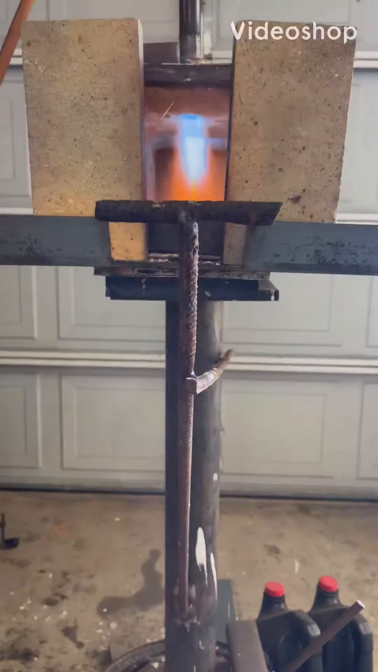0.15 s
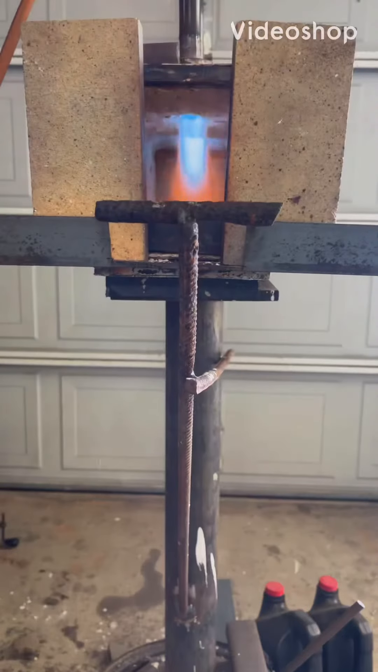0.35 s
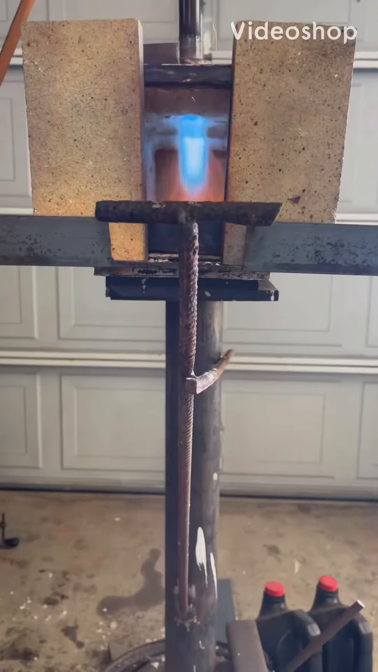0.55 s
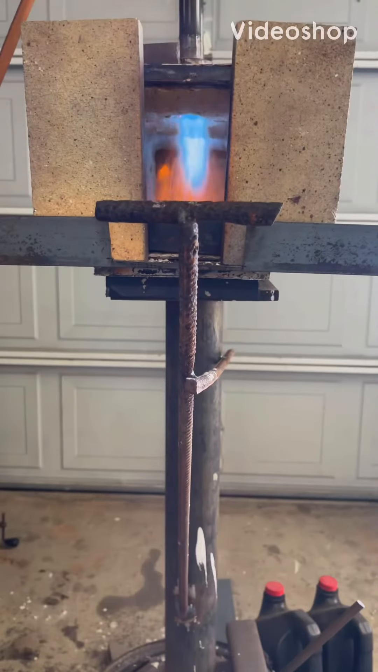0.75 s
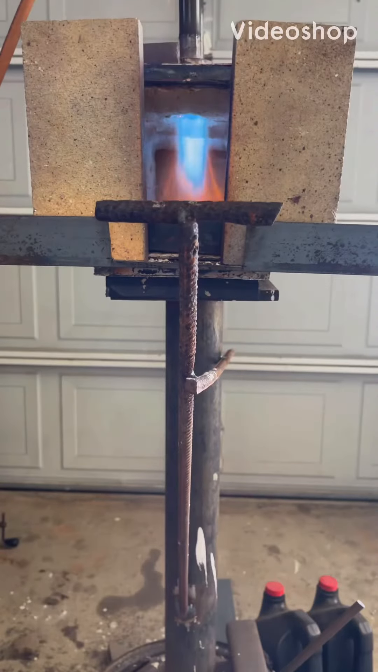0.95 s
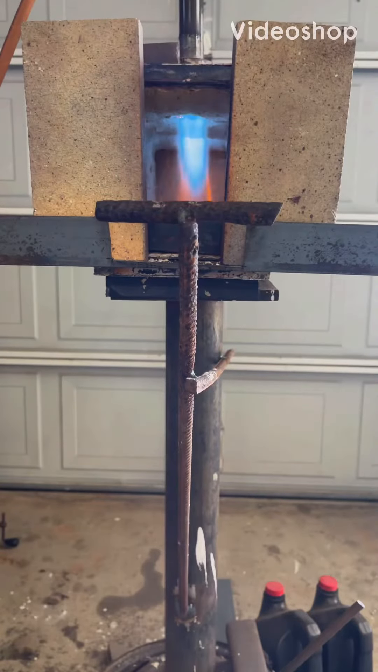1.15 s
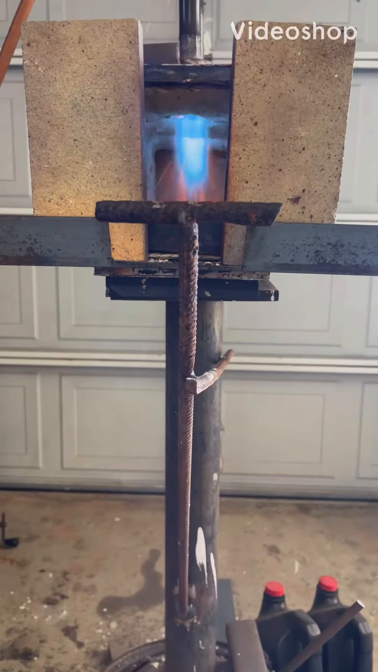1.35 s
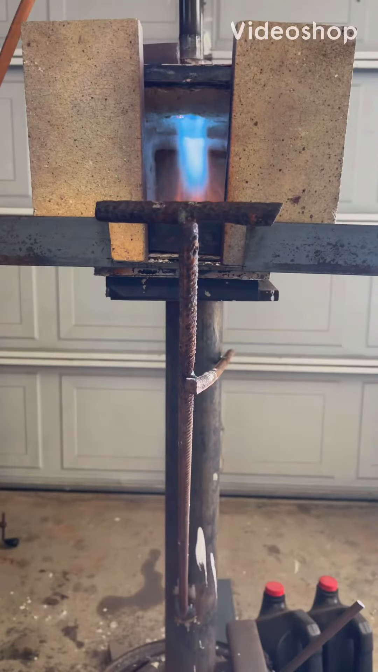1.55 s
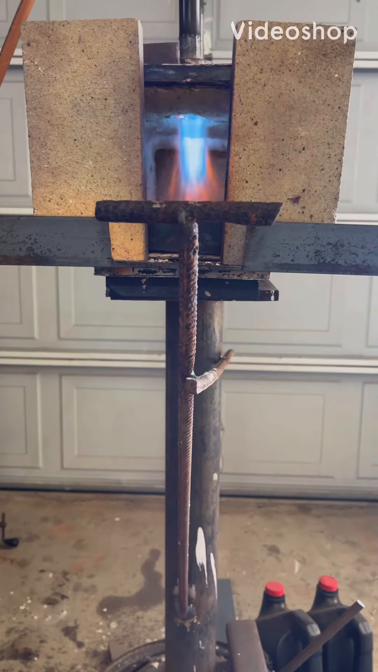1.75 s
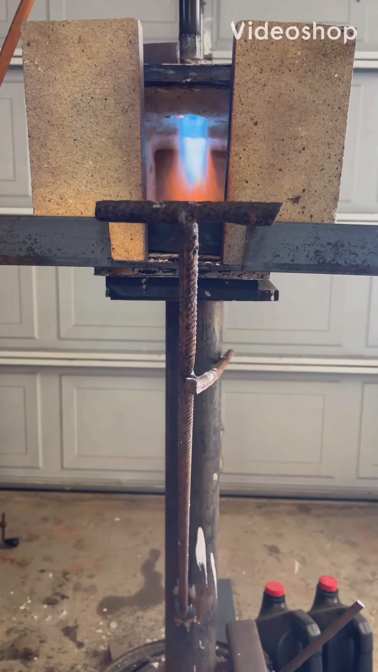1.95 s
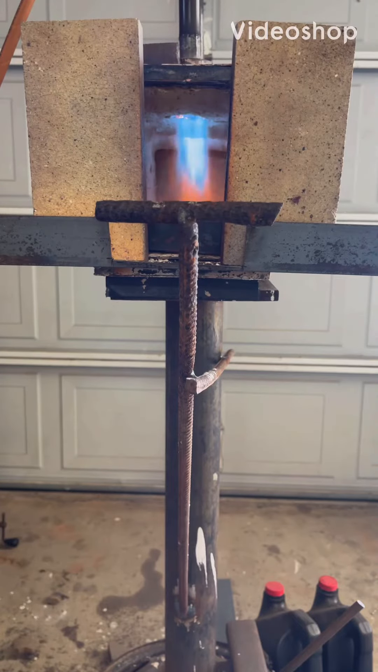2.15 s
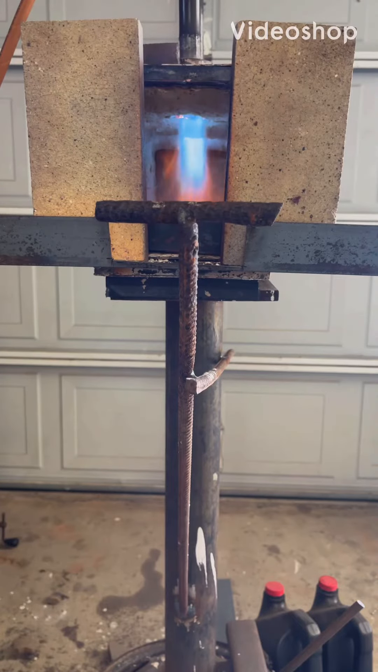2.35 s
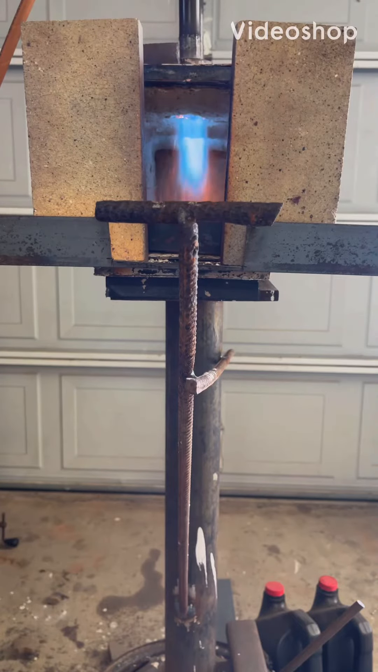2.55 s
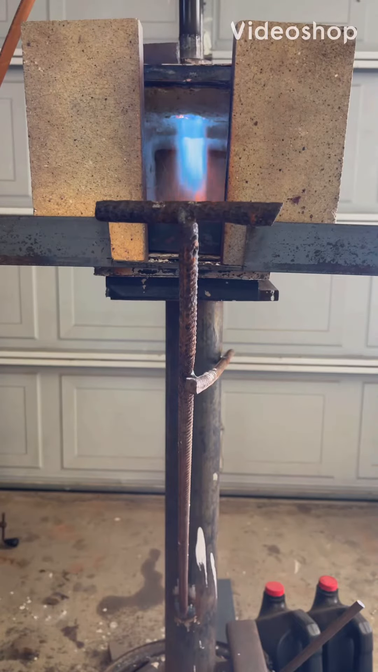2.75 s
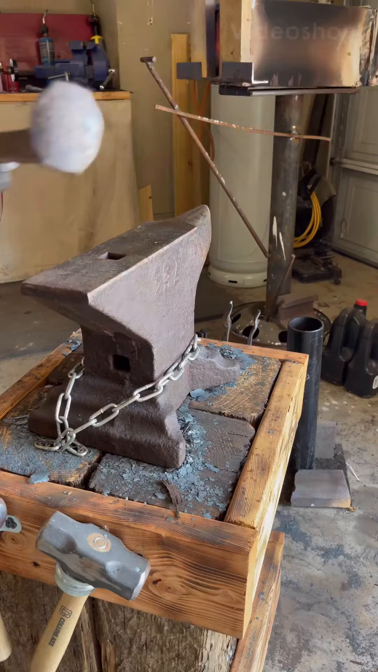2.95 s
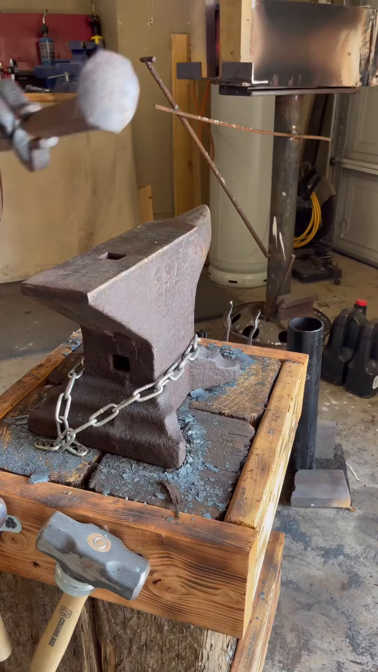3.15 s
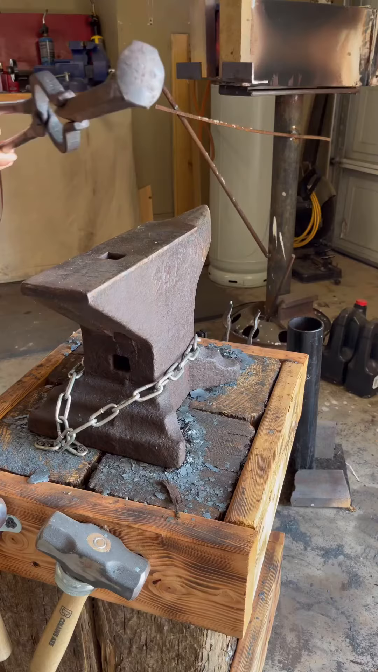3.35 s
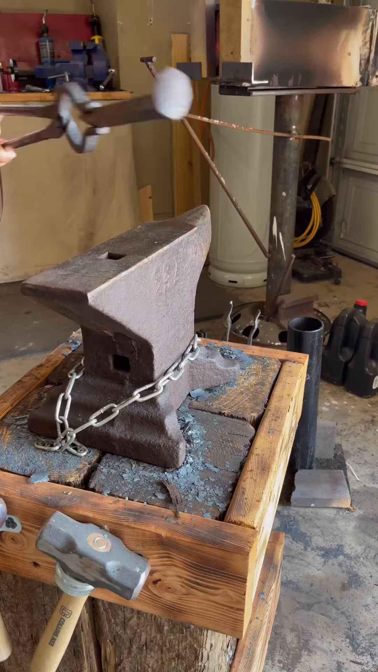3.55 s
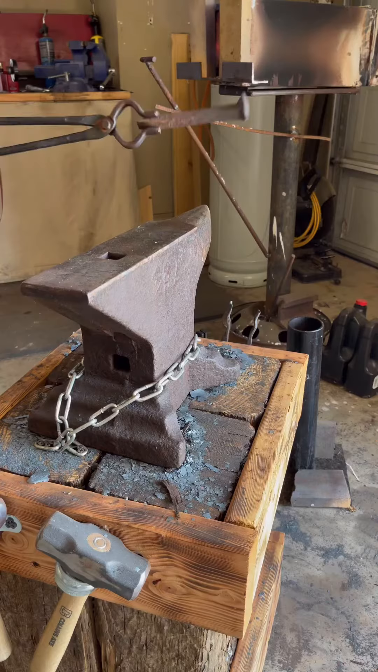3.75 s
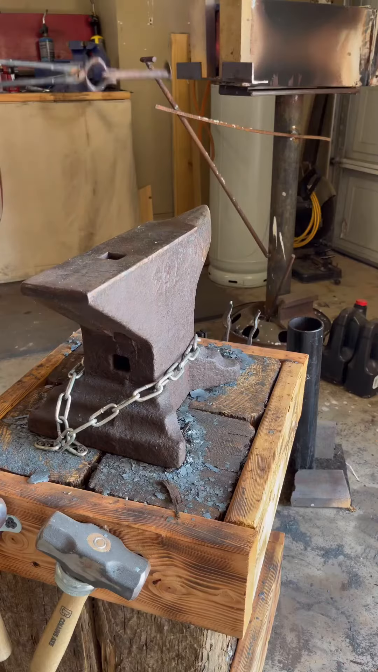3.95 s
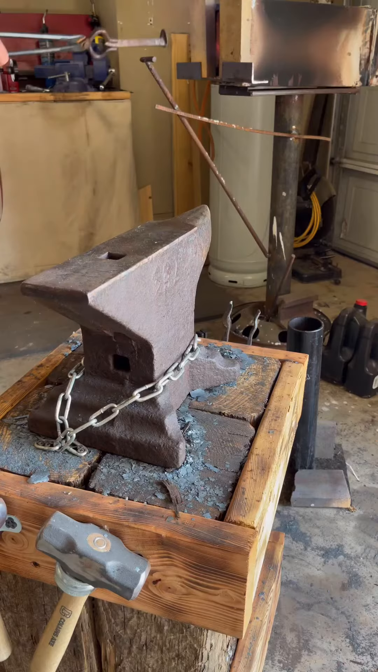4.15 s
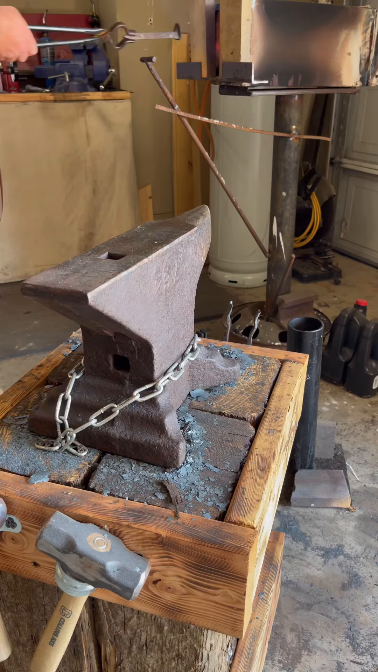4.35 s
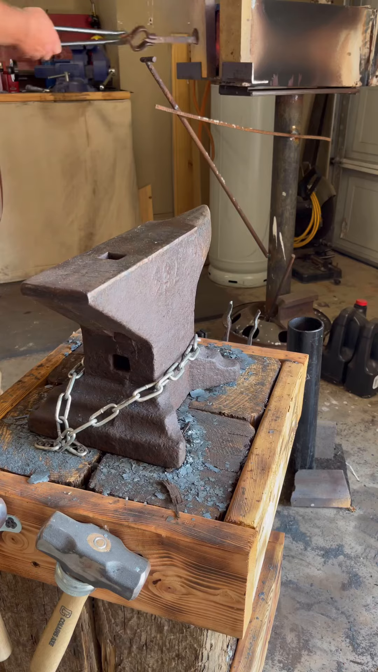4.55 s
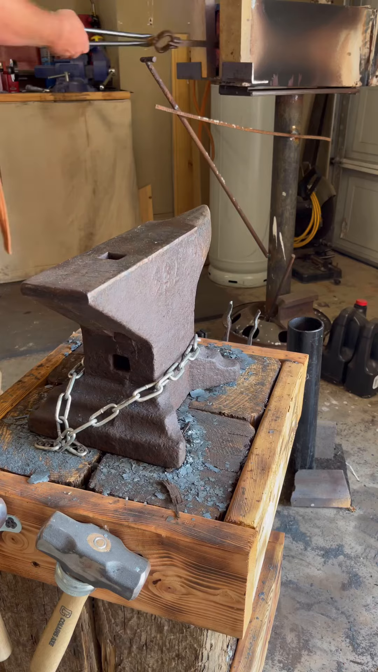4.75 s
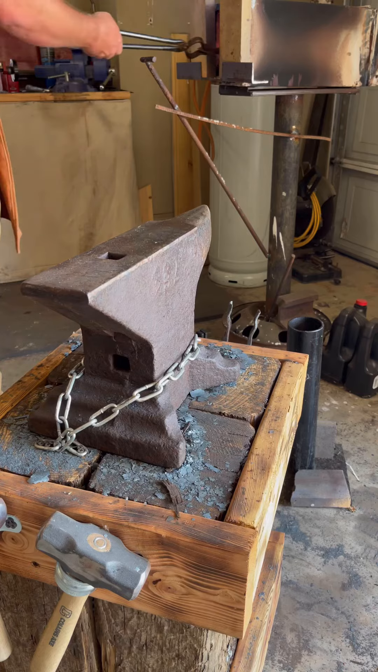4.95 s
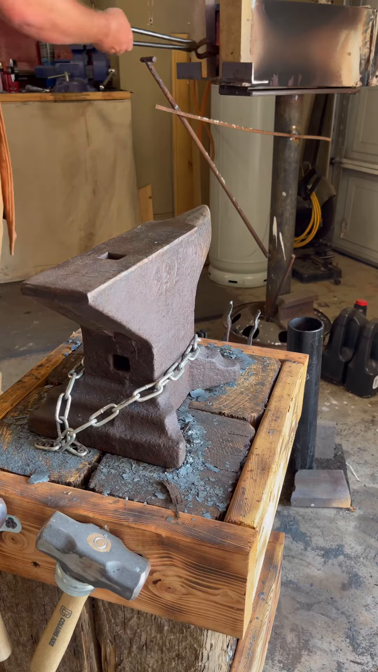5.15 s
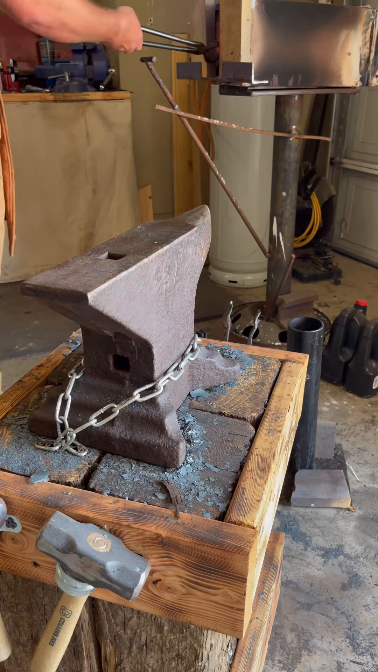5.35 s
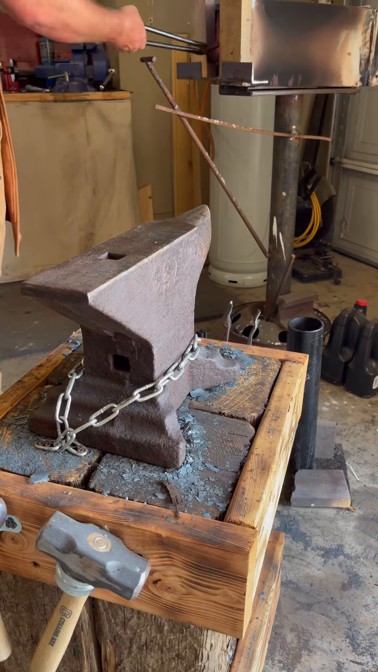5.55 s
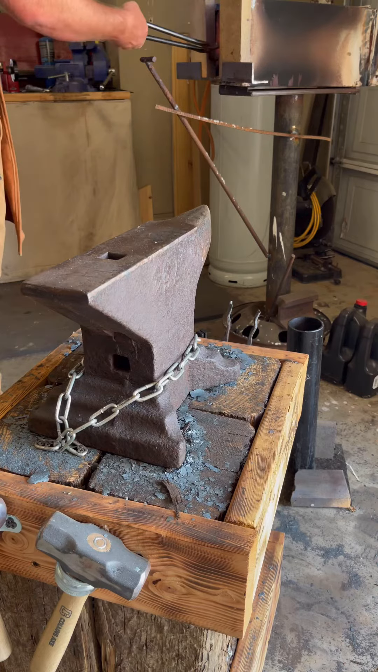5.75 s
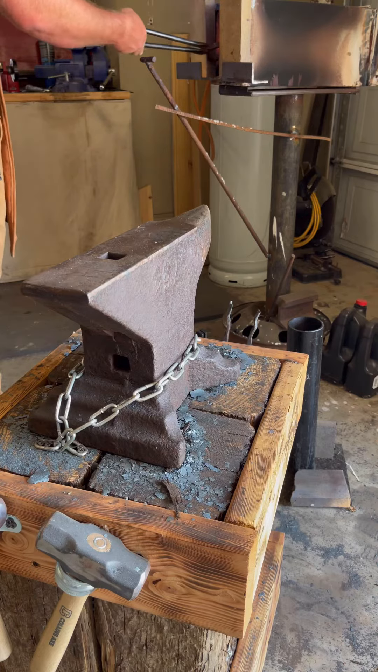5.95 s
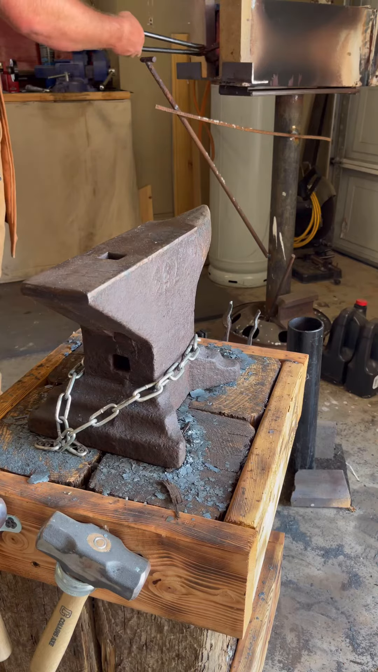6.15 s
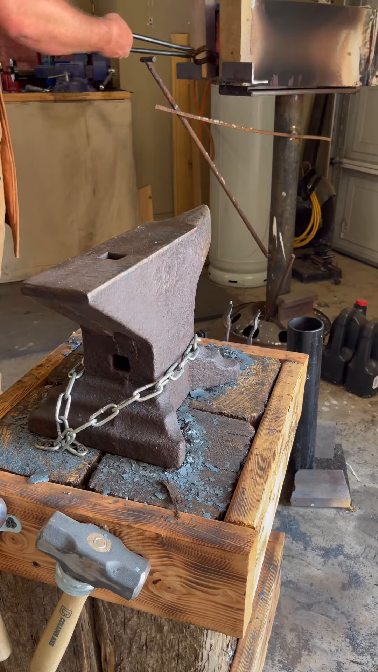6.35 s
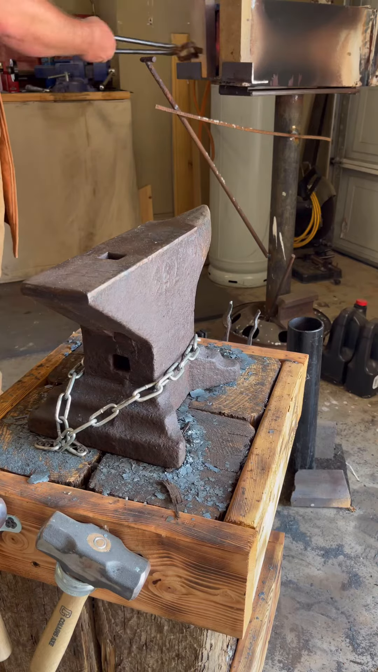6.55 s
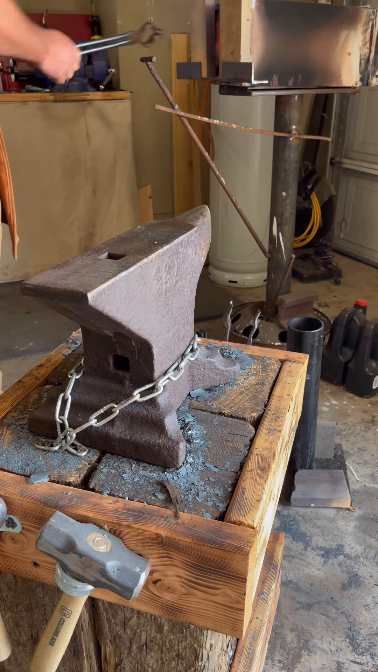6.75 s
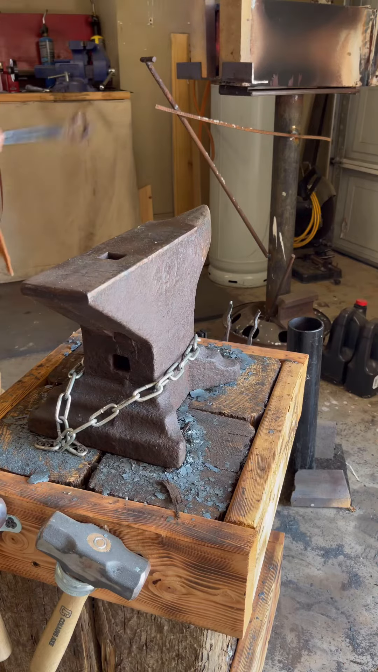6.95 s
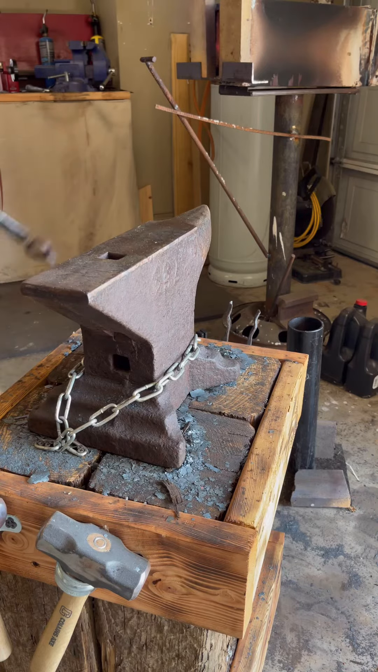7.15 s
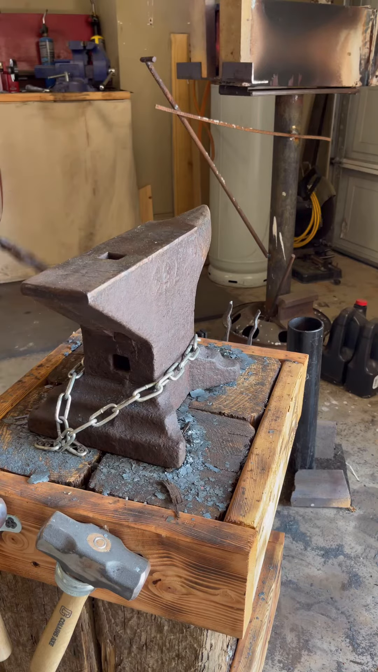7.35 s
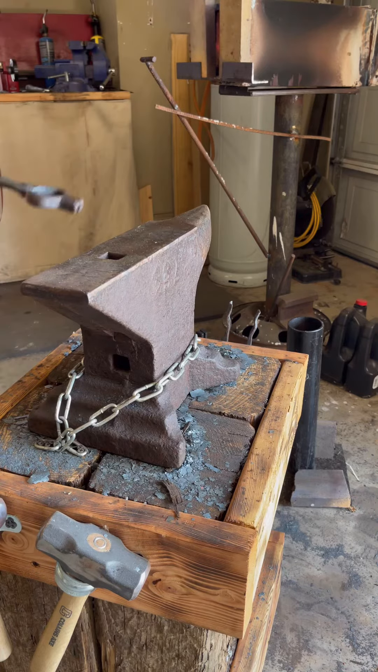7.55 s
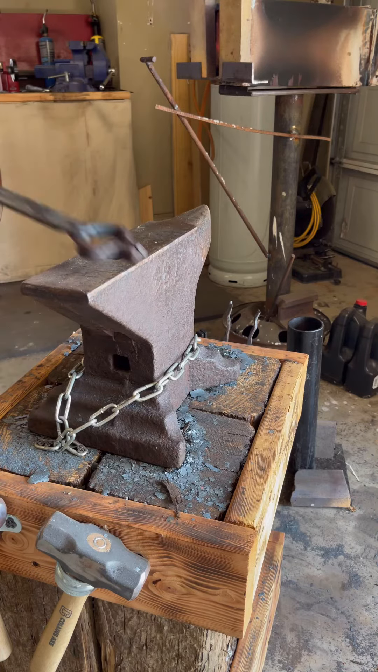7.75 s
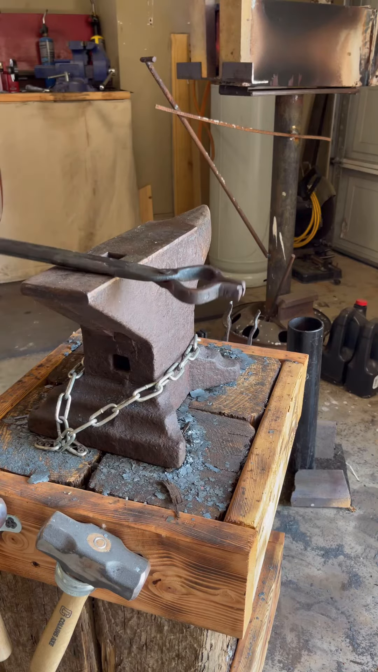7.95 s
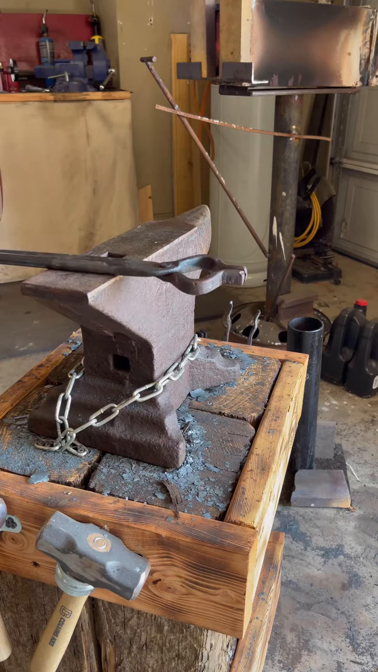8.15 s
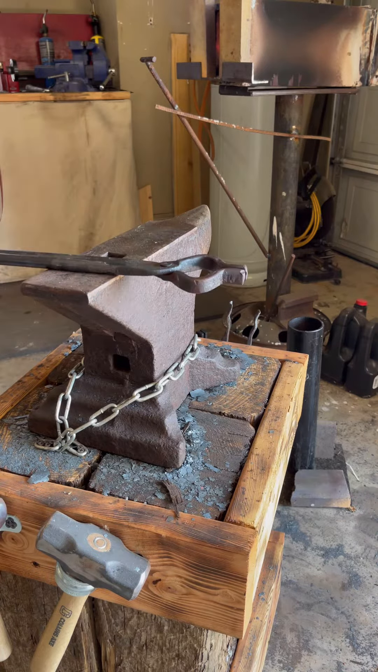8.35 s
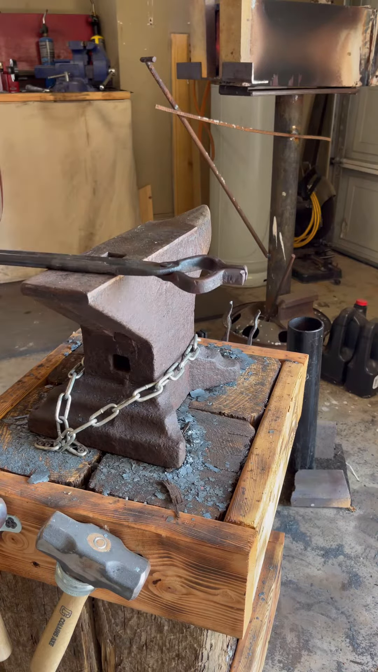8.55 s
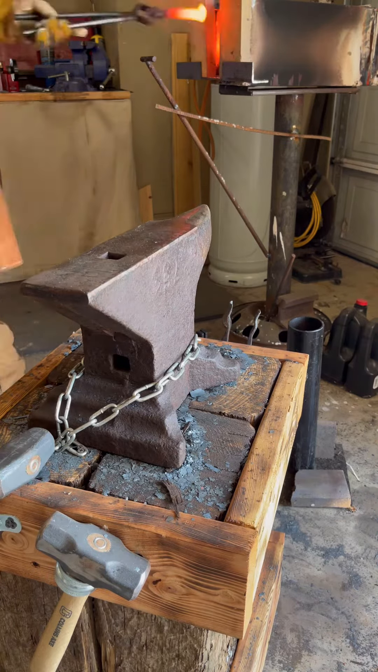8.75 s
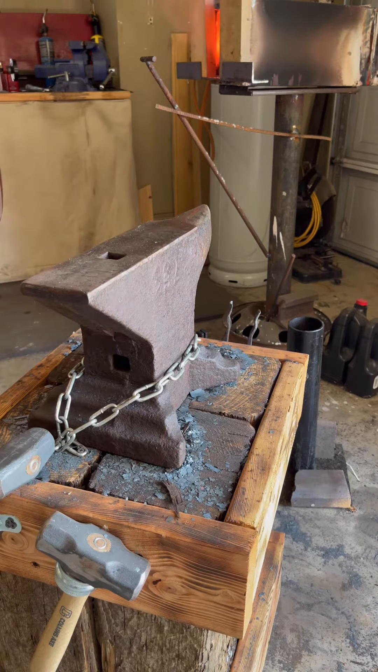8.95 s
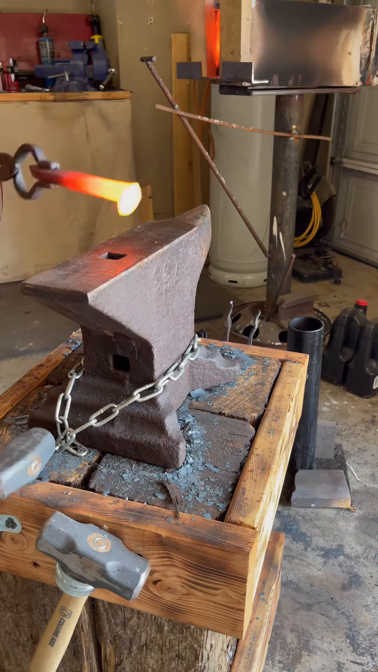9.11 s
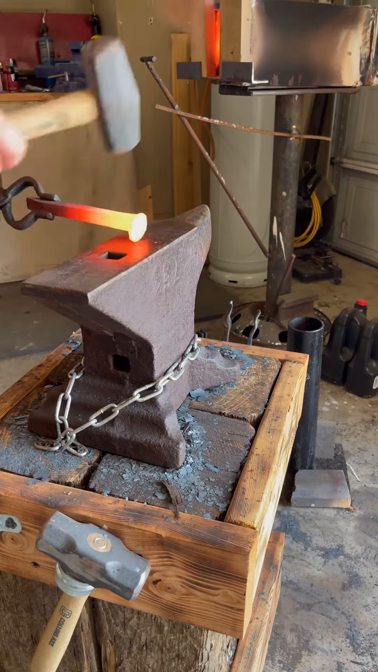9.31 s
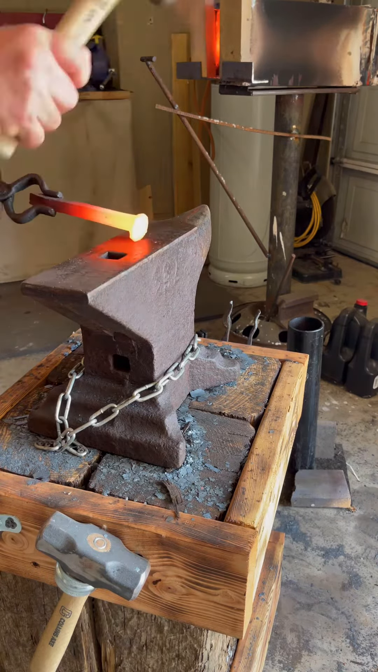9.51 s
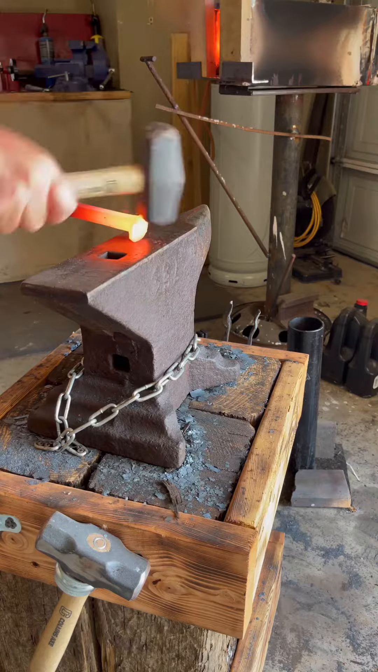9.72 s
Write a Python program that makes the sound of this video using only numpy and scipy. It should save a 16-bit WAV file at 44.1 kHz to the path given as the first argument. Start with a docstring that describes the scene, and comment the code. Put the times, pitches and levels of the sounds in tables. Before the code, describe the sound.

Steady burner roar in a garage, abruptly muffled, metal tongs clinking on an anvil, then a jump to high-pitched fast-motion hiss with five quick hammer clicks.

```python
"""A propane forge roars in a garage and spits a few crackles: this is in front of the burner. Then comes the dull roar
beside the anvil, where tongs are laid on the steel, then the same place in five-fold fast motion: a thin hiss and ticks.
The roar is coloured noise, flame rumble plus gas hiss, with peaks and dips that differ between the places. Crackles and
hammer blows are short noise bursts, ringing steel is a set of dying sine tones, and whistles and flecks are brief tones."""
import sys
import numpy as np
from scipy import signal
from scipy.fft import rfft, irfft, next_fast_len
from scipy.io import wavfile
from scipy.ndimage import uniform_filter1d

SR = 44100
rng = np.random.default_rng(int(sys.argv[2]) if len(sys.argv) > 2 else 0)


def unload_wav(signal):
    """Save mono or channel-first audio to the path in sys.argv[1] as 16-bit WAV at rate SR, clipped to [-1, 1]."""
    wavfile.write(
        sys.argv[1],
        SR,
        np.round(np.clip(np.atleast_2d(signal).T, -1, 1) * 32767).astype(np.int16),
    )


N = 431298
TIME = np.arange(N) / SR
HZ = np.fft.rfftfreq(next_fast_len(N, real=True), 1 / SR) + 1e-3  # just above 0, so its logarithm exists

# the three parts: (start [s], end [s])
FRONT_PART, ANVIL_PART, FAST_PART = (0, 2.979), (2.982, 8.637), (8.647, 9.8)
FAST_MOTION = 5  # how many times faster than natural

# broad colour of the roar in each part, only its shape counts: (natural-speed frequency [Hz], level [dB])
FRONT_COLOUR = [(22, -20), (45, -19), (80, -1.2), (200, -3), (400, -4.5), (700, -11), (1050, -11.5),
                (1600, -21), (2300, -17.5), (4000, -28), (7000, -28), (10500, -31.5), (13000, -47.5),
                (14200, -56), (15200, -72)]
ANVIL_COLOUR = [(22, -35.5), (40, -23.5), (75, -14), (140, -9.5), (200, 0.5), (360, -4), (460, -19.5),
                (750, -28), (1300, -31.5), (1650, -42), (2200, -29), (2800, -38.5), (3500, -40),
                (3750, -49)]
FAST_COLOUR = [(14, -64), (30, -31.5), (50, -20.5), (80, -14), (140, -7.5), (200, 0), (340, -2.5),
               (405, -6.5), (460, -16.5), (750, -27), (1300, -31), (1650, -36), (2200, -20), (2700, -24.5),
               (3130, -25.5)]
# peaks and dips in the colour of the roar at the two places:
# (natural-speed frequency [Hz], width [Hz], height [dB])
FRONT_PEAKS = [(104, 16.6, 3), (140, 12, 5.5), (149.5, 9, -3.5), (161.5, 14, 5.5), (172.7, 31.7, 14),
               (196, 10, -6.5), (219, 8.5, 3), (230.3, 21, 11.5), (265.7, 59, 11), (296.4, 7.8, -7),
               (305, 8.9, 5), (327, 8, 5.5), (534, 14, 2.5), (352.2, 35.6, 11), (421.6, 45, 10),
               (512, 29, -7.5), (525, 133, 8.5), (642, 52, 4.5), (846, 79, 4.5), (1000, 74, 3.5),
               (1156, 17, -10), (1777, 120, -11.5), (3085, 130, -10.5), (4870, 450, -13),
               (9010, 850, -25.5)]
ANVIL_PEAKS = [(57, 12, -2.5), (114, 22, -4), (137, 6.4, 3), (148, 7.4, -2.5), (161, 7.5, 3.5),
               (172.8, 15.7, -14), (198.7, 6, 2.5), (207.2, 5, -4.5), (214.7, 4.7, 2), (237.5, 17, -10.5),
               (301.3, 13.8, -7), (313.3, 9, 4.5), (342, 6.5, 1.5), (358.2, 11, -4.5), (367, 7, 3),
               (376, 6, -3.5), (383, 9, 3.5), (401, 7, -2.5), (427, 8, 5), (548, 16, 2.5), (443, 18, -6.5),
               (496, 25, 6), (571, 12, -4.5), (633, 110, 3.5), (684, 24, -14), (698.3, 18, 10),
               (757, 7.4, -7), (845.5, 11, 8.5), (883, 110, 3), (1040, 21, -6), (1090, 14, 4),
               (1210, 16, 3), (1300, 15, 3), (1471, 35, 5), (1606, 26, 3.5), (1795, 49, 8.5),
               (2400, 197, -6), (2550, 9.1, 8), (2920, 220, -5), (3150, 47, 1.5)]
# stereo width of the roar, before a side trim: (natural-speed frequency [Hz], side minus mid [dB])
FRONT_SIDE = [(60, -62), (200, -37), (400, -16.5), (700, -13.5), (1000, -18), (1400, -38), (2300, -28),
              (3200, 3), (6500, -1.5), (7500, 4), (9400, 26), (11000, 2), (14000, -12)]
ANVIL_SIDE = [(60, -46), (200, -32.5), (380, -20), (470, -12.5), (700, -9.5), (1300, -13.5), (1600, -18.5),
              (2200, -10), (2700, -4), (3600, -5.5)]
FAST_SIDE = [(60, -27), (140, -59), (260, -51), (320, -33), (450, -8.5), (900, -1), (1200, -14),
             (1900, -50), (2200, -2), (3000, 2)]
# part of the side sound is the direct roar reaching one port first; positive means the left leads:
# (natural-speed frequency [Hz], share [-1 to 1])
FRONT_LEAD = [(130, 0), (400, -0.44), (1500, -0.23), (2700, 0.196), (3400, 0.61), (4600, .7),
              (5200, -0.774), (7000, 0.74), (8500, 0.58), (10000, -1), (12500, 0)]
ANVIL_LEAD = [(110, 0), (260, -.55), (900, -.4), (1300, -.1), (1800, .62), (3700, .55)]
FAST_LEAD = [(280, 0), (480, -.4), (600, 0), (1900, 0), (2200, .35)]
# the burner runs at one setting; its level at the microphone: (flame [dB], gas jet [dB], drift [dB per s])
FRONT_LEVEL = (-20, -41, 0.077)
ANVIL_LEVEL = (-21, -43, 0.017)
FAST_LEVEL = (-21.5, -42.5, -2.1)
# the flame flutters, the gas flow wanders and the jet flickers: rates at natural speed, depths in dB
FLUTTER_PER_S, FLUTTER_DB = 6.4, 0.36
WANDER_PER_S, WANDER_DB = 0.41, 0.95
JET_FLICKER_PER_S, JET_FLICKER_DB = 15, 0.34
# depth of the random ripple in the colour above the bass; it gives the hiss a ringing grain
RIPPLE_DB, FAST_RIPPLE_DB = 1.7, 2.8

# hammer blows on the hot bar, in fast motion: (time [s], level [dB])
BLOWS = [(9.3710, -24), (9.4501, -19), (9.532, -20), (9.618, -18), (9.7020, -16.5)]
# colour of a blow, only its shape counts: (frequency [Hz], level [dB])
BLOW_COLOUR = [(60, -28), (170, -11), (330, 5.5), (700, 3), (1400, -0.5), (2800, 4), (4500, -5),
               (6200, -6.5), (7100, -5), (9000, -14), (15500, -17)]

# the tongs meet the anvil and settle:
# (time [s], contact [dB], ring of the tongs [dB], ring of the anvil [dB], tilt of the ring [dB per octave])
TONG_TOUCHES = [(7.6525, -40, -41, -65, -7), (7.6671, -27.5, -39, -54.5, -5), (7.6773, -38, -52, -64, -5.5),
                (7.7878, -26.5, -33, -46.5, 2), (7.796, -32, -49, -62, -1), (7.8123, -33, -52, -56, 0),
                (7.835, -38, -57.5, -47, 0.5), (7.8575, -36, -56, -55, 2)]
TILT_PIVOT_HZ = 2500  # the tilt changes nothing for a tone listed at this pitch
# colour of the contact noise, only its shape counts: (frequency [Hz], level [dB])
CONTACT_COLOUR = [(500, -31), (1300, 0.5), (2200, 2), (3000, 5.5), (3500, 0), (3800, -12), (4200, -17)]
# the hand-held tongs ring briefly, the anvil sings on; a speed factor then raises or lowers the pitch and
# shortens or stretches the ring: (frequency [Hz], level [dB], time to fall 60 dB [s])
TONG_MODES = [(1440, -6, .06), (1610, -7, .1), (2090, -3.5, .08), (2270, 0.5, 0.085), (2500, 4.5, 0.09),
              (2940, -2, .11), (3040, 0, .035), (3170, -0.5, .05), (3370, -7, .06), (3480, -2, 0.032)]
ANVIL_MODES = [(2935, -10, .4), (3015, -13, .35), (3150, -1.5, .45), (3210, -8, .35), (3630, -13.5, .25)]  # close pairs beat
# reflections make the ring of the steel swell and dip as it dies away
RING_SHIMMER_PER_S, RING_SHIMMER_DB = 45, 2.5

# crackles in the fire: (time [s], level [dB], time to fall 60 dB [s])
CRACKLES = [(0.046, -31.5, 0.029), (0.0502, -35, 0.025), (0.1712, -27.5, 0.008)]
# colour of a crackle, only its shape counts: (frequency [Hz], level [dB])
CRACKLE_COLOUR = [(4000, -25), (5200, -15), (6000, -1.5), (7000, 0.5), (8200, -5.5), (9200, -19),
                  (10500, -9.5), (12500, -19), (14500, -34)]

# the clearest thin whistles in the fast hiss: (middle time [s], frequency [Hz], level [dB])
WHISTLES = [(8.672, 12720, -46.5), (8.785, 5990, -44), (8.856, 9905, -47), (8.861, 11970, -49),
            (8.885, 10400, -47), (8.911, 8040, -50), (9.035, 7150, -50), (9.07, 2960, -35.5),
            (9.125, 11940, -46), (9.235, 11890, -47), (9.25, 10335, -47), (9.255, 4230, -44),
            (9.352, 11890, -45), (9.408, 10310, -40), (9.577, 7970, -47.5), (9.607, 3300, -34)]
WHISTLE_S = 0.048  # length of each
# high metallic tones that glimmer throughout the fast part, slowly fading: (frequency [Hz], level [dB])
GLIMMERS = [(5980, -60), (8020, -59), (9030, -64), (10330, -60), (10800, -58), (11060, -61), (11890, -59),
            (12010, -61), (13500, -66)]
GLIMMER_PER_S, GLIMMER_WIDTH_HZ = 10, 46
GLIMMER_DB, GLIMMER_DB_PER_S = 3, -4  # depth of the glimmer, and its slow fade
# random ringing flecks in the fast part: how many, their pitch range and their length
FLECK_COUNT, FLECK_RANGE_HZ, FLECK_S = 260, (2500, 15500), 0.04

TICK_S, TICK_DB = 4.369, -12  # one tiny dry tick, its level before the filters
DULL_HZ, TOP_HZ = 3900, 15850  # treble limits: beside the anvil, and of the whole sound


def undb(db):
    """Turn decibels into a plain multiplier."""
    return 10 ** (np.asarray(db) / 20)


def rms(x):
    """Average strength: the root of the mean square."""
    return np.sqrt(np.mean(x ** 2))


def colour(points, hz):
    """Gain at each frequency, joining the listed points in dB on a logarithmic frequency axis."""
    point_hz, point_db = np.transpose(points)
    return undb(np.interp(np.log(hz), np.log(point_hz), point_db))


def shape(x, gain):
    """Filter a sound by one gain per frequency."""
    size = next_fast_len(N, real=True)
    return irfft(rfft(x, size) * gain, size)[..., :N]


def noise(gain):
    """Steady random noise of the given colour, with average strength near 1."""
    return shape(rng.standard_normal(N), gain / rms(gain))


def walk(rate):
    """Smooth random movement, about rate times a second, with spread near 1."""
    return noise(np.exp(-(HZ / rate) ** 2))


def smooth(x, seconds):
    """Running mean, taken twice."""
    size = int(seconds * SR)
    return uniform_filter1d(uniform_filter1d(x, size), size)


def decay(start, t60):
    """An envelope that jumps to 1 and falls 60 dB in t60 seconds; it is cut off after half a second."""
    out = np.zeros(N)
    first = int(start * SR)
    age = TIME[:min(SR // 2, N - first)]
    out[first:first + len(age)] = np.exp(-np.log(1000) * np.minimum(age / t60, 10))
    return out


def click(start):
    """A single impulse."""
    out = np.zeros(N)
    out[int(start * SR)] = 1
    return out


def burst(envelope, gain):
    """Dense tiny impacts: noise under an envelope, then coloured."""
    return shape(envelope * rng.standard_normal(N), gain / rms(gain))


def stereo(mid, side):
    """Left and right: the side sound is added to one ear and taken from the other."""
    return np.array([mid + side, mid - side])


def low_pass(x, hz):
    """A steep cut of the treble."""
    return signal.sosfilt(signal.ellip(10, .2, 90, hz, fs=SR, output="sos"), x)


def cut(part):
    """1 while a part lasts, with edges about a millisecond long."""
    inside = (TIME >= part[0]) & (TIME < part[1])
    return smooth(inside * 1., .001)


def ripple(hz, spacing_hz, depth_db):
    """A random, irregular ripple over frequency, drawn anew for each part, gives the roar a fine tonal grain."""
    knots = np.arange(0, SR / 2, spacing_hz)
    db = depth_db * np.interp(hz, knots, rng.standard_normal(len(knots)))
    return undb(db * hz ** 2 / (hz ** 2 + 450 ** 2))  # the ripple fades out towards the bass


def burner(part, levels, broad, peaks, diffuse, lead, speed, ripple_db, side_db):
    """Flame rumble and gas hiss, coloured by peaks and dips; speed scales every pitch and flutter rate."""
    hz = HZ / speed
    peak_db = sum(db / (1 + (2 * (hz - f) / width) ** 2) for f, width, db in peaks)
    gain = colour(broad, hz) * undb(peak_db)
    gain = gain * ripple(hz, spacing_hz=10, depth_db=ripple_db)
    gain = gain * hz ** 2 / (hz ** 2 + 14 ** 2)  # the microphone loses the deepest bass
    flame_share = 1 / (1 + (hz / 1400) ** 8)  # combustion below, jet above
    flame_gain = gain * np.sqrt(flame_share)
    jet_gain = gain * np.sqrt(1 - flame_share)

    # one gas flow feeds both; flame and jet each flutter on top of it
    flame_db, jet_db, drift_db_per_s = levels
    drift_db = drift_db_per_s * (np.clip(TIME, *part) - np.mean(part))
    flow_db = drift_db + WANDER_DB * walk(WANDER_PER_S * speed)
    flame = undb(flame_db + flow_db + FLUTTER_DB * walk(FLUTTER_PER_S * speed))
    jet = undb(jet_db + flow_db + JET_FLICKER_DB * walk(JET_FLICKER_PER_S * speed))
    direct = noise(flame_gain) * flame + noise(jet_gain) * jet

    # what the walls send back differs left and right; the direct sound reaches one port a little earlier
    scattered = noise(flame_gain) * flame + noise(jet_gain) * jet
    lead_hz, lead_share = np.transpose(lead)
    share = np.clip(np.interp(hz, lead_hz, lead_share), -1, 1)
    side_gain = colour(diffuse, hz) * undb(side_db)
    early = shape(direct, 1j * share * side_gain)  # 1j turns the wave by a quarter cycle
    spread = shape(scattered, np.sqrt(1 - share ** 2) * side_gain)
    return stereo(direct, early + spread)


def hammer(snap_db, crack_t60, bounce_s, bounce_db, room_t60, room_db):
    """Soft hot iron damps the anvil: each blow is a snap and dry crack, a slap off a wall and a short echo wash."""
    snap, crack, echo = np.zeros((3, N))
    for start, db in BLOWS:
        bounce = start + bounce_s
        snap += undb(db + snap_db) * (click(start) + undb(bounce_db) * click(bounce))
        crack += undb(db) * (decay(start, crack_t60) + undb(bounce_db) * decay(bounce, crack_t60))
        echo += undb(db + room_db) * decay(start, room_t60)
    gain = colour(BLOW_COLOUR, HZ)
    return shape(snap, gain / rms(gain)) + burst(crack + echo, gain)


def ring(modes, touches, speed):
    """Struck steel: each (time [s], level [dB], tilt [dB per octave]) touch feeds tones that die away."""
    out = np.zeros((2, N))  # mid and side, each with its own random phase
    phases = rng.uniform(0, 2 * np.pi, (len(modes), 2))
    for (hz, db, t60), phase in zip(modes, phases):
        octaves = np.log2(hz / TILT_PIVOT_HZ)
        envelope = sum(undb(db + touch_db + tilt * octaves) * decay(start, t60 / speed)
                       for start, touch_db, tilt in touches)
        on = envelope > 0
        out[:, on] += envelope[on] * np.sin(2 * np.pi * hz * speed * TIME[on] + phase[:, None])
    return out


def hammer_ring(tongs_db, anvil_db, tilt_db, side_db):
    """The blows also ring tongs and anvil, which in fast motion become short, very high pings."""
    tong_blows = [(start, db + tongs_db, tilt_db) for start, db in BLOWS]
    anvil_blows = [(start, db + anvil_db, tilt_db) for start, db in BLOWS]
    mid, side = ring(TONG_MODES, tong_blows, FAST_MOTION) + ring(ANVIL_MODES, anvil_blows, FAST_MOTION)
    return stereo(mid, undb(side_db) * side)


def tongs(snap_db, contact_t60, room_t60, room_db, side_db):
    """Each touch snaps and clacks, scatters round the garage and rings both tongs and anvil."""
    starts, contact_db, tongs_db, anvil_db, tilts = np.transpose(TONG_TOUCHES)
    tong_ring = ring(TONG_MODES, list(zip(starts, tongs_db, tilts)), speed=0.98)
    anvil_ring = ring(ANVIL_MODES, list(zip(starts, anvil_db, tilts)), speed=0.99)
    shimmer = undb(RING_SHIMMER_DB * walk(RING_SHIMMER_PER_S))
    steel_mid, steel_side = (tong_ring + anvil_ring) * shimmer

    contact, snap = np.zeros((2, N))
    for start, db in zip(starts, contact_db):
        contact += undb(db) * (decay(start, contact_t60) + undb(room_db) * decay(start, room_t60))
        snap += undb(db + snap_db) * click(start)
    gain = colour(CONTACT_COLOUR, HZ)
    mid = steel_mid + shape(snap, gain / rms(gain)) + burst(contact, gain)
    side = steel_side + burst(contact, gain)
    return stereo(mid, undb(side_db) * side)


def crackles(side_db, room_db, room_t60):
    """Short bright spits from the hot chamber, each with a faint wash of garage echo."""
    spits = np.zeros(N)
    for start, db, t60 in CRACKLES:
        spits += undb(db) * (decay(start, t60) + undb(room_db) * decay(start, room_t60))
    gain = colour(CRACKLE_COLOUR, HZ)
    return stereo(burst(spits, gain), undb(side_db) * burst(spits, gain))


def whistles(waver_hz):
    """A few clear, wavering tones swell and fade over narrow bands of noise that glimmer at random."""
    waver = 2 * np.pi * np.cumsum(waver_hz * walk(151)) / SR
    out = np.zeros(N)
    for middle, hz, db in WHISTLES:
        on = np.abs(TIME - middle) < WHISTLE_S / 2
        swell = np.cos(np.pi * (TIME[on] - middle) / WHISTLE_S)
        tone = np.sqrt(2) * np.sin(2 * np.pi * hz * TIME[on] + waver[on])
        out[on] += undb(db) * swell * tone
    fade_db = GLIMMER_DB_PER_S * (np.clip(TIME, *FAST_PART) - np.mean(FAST_PART))
    for hz, db in GLIMMERS:
        level = undb(db + fade_db + GLIMMER_DB * walk(GLIMMER_PER_S))
        out += level * noise(1 / (1 + (2 * (HZ - hz) / GLIMMER_WIDTH_HZ) ** 4))
    return out


def flecks(level_db, tilt_db, spread_db):
    """Many faint tones at random times and pitches give the fast hiss its grain."""
    out = np.zeros(N)
    lowest, highest = FLECK_RANGE_HZ
    for when, pitch, size, phase in rng.uniform(0, 1, (FLECK_COUNT, 4)):
        middle = FAST_PART[0] + when * (FAST_PART[1] - FAST_PART[0])
        hz = lowest + pitch * (highest - lowest)
        on = slice(int((middle - FLECK_S / 2) * SR), int((middle + FLECK_S / 2) * SR))
        # higher flecks are fainter (tilt); chance lowers each by up to spread_db
        db = level_db + tilt_db * np.log2(hz / lowest) + spread_db * np.log2(1 - size / 2)
        swell = np.cos(np.pi * (TIME[on] - middle) / FLECK_S)
        out[on] += undb(db) * swell * np.sin(2 * np.pi * (hz * TIME[on] + phase))
    return out


def tick():
    """A single tiny click, its treble gently softened."""
    return shape(undb(TICK_DB) * click(TICK_S), 1 / (1 + 1j * HZ / 7000))


def scene():
    """The three parts, one after the other."""
    front = burner(FRONT_PART, FRONT_LEVEL, FRONT_COLOUR, FRONT_PEAKS, FRONT_SIDE, FRONT_LEAD,
                   speed=0.99, ripple_db=RIPPLE_DB, side_db=-5.0)
    front = front + crackles(side_db=-2.0, room_db=-17, room_t60=0.12)

    anvil = burner(ANVIL_PART, ANVIL_LEVEL, ANVIL_COLOUR, ANVIL_PEAKS, ANVIL_SIDE, ANVIL_LEAD,
                   speed=1, ripple_db=RIPPLE_DB, side_db=1)
    anvil = anvil + tongs(snap_db=12.5, contact_t60=0.0079, room_t60=0.14, room_db=-18, side_db=-10.5)
    anvil = low_pass(anvil, DULL_HZ) + tick()  # only the tick keeps its treble

    fast = burner(FAST_PART, FAST_LEVEL, FAST_COLOUR, ANVIL_PEAKS, FAST_SIDE, FAST_LEAD,
                  speed=FAST_MOTION, ripple_db=FAST_RIPPLE_DB, side_db=-3.5)
    fast = fast + hammer(snap_db=13, crack_t60=0.0084, bounce_s=0.0049, bounce_db=-11,
                         room_t60=0.084, room_db=-7.0)
    fast = fast + hammer_ring(tongs_db=-22, anvil_db=-20, tilt_db=-7, side_db=-8)
    fast = fast + flecks(level_db=-39, tilt_db=-5, spread_db=11)
    fast = fast + whistles(waver_hz=29.8)
    return front * cut(FRONT_PART) + anvil * cut(ANVIL_PART) + fast * cut(FAST_PART)


def record(dry):
    """The phone hears the left a shade louder and cuts the top."""
    ports = undb([[.13], [-.13]])  # left and right, in dB
    return low_pass(dry * ports, TOP_HZ)


dry = scene()
out = record(dry)
unload_wav(out)
```